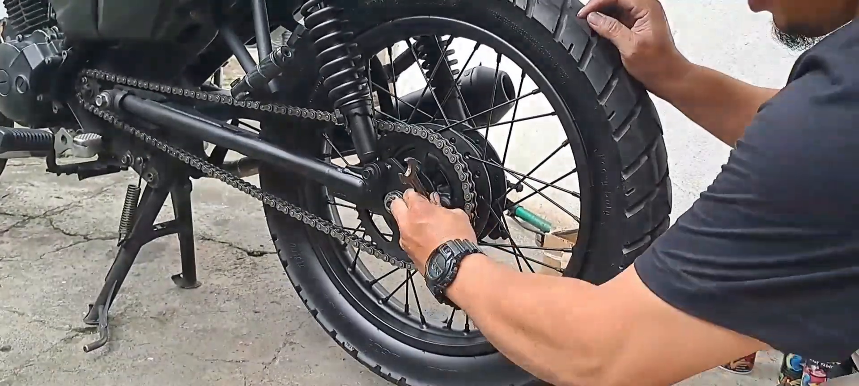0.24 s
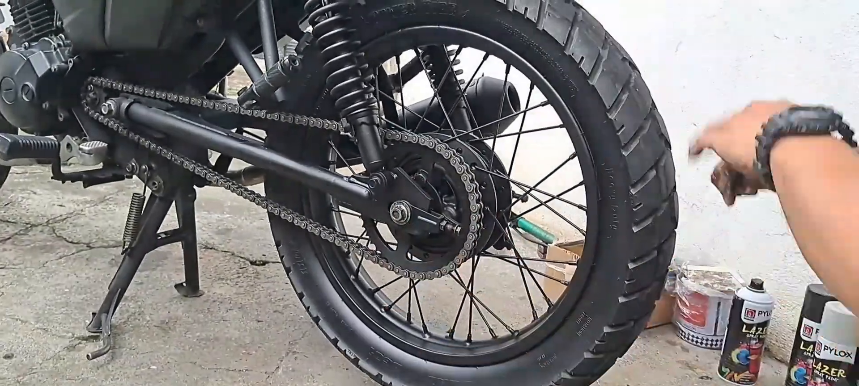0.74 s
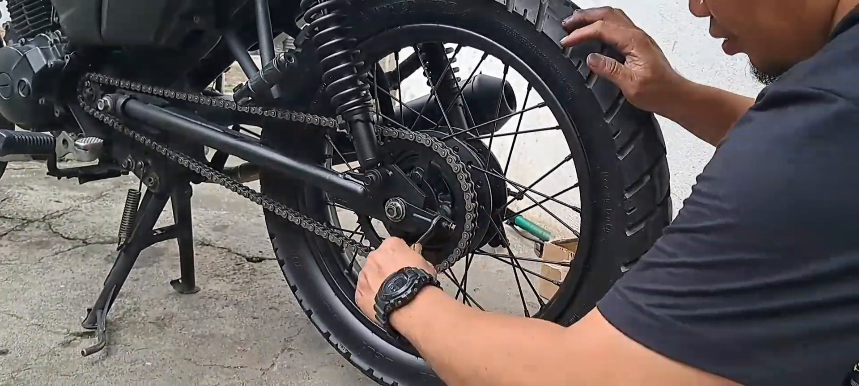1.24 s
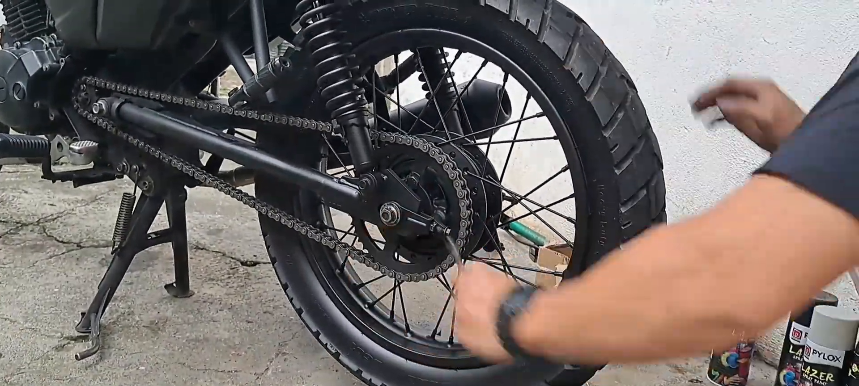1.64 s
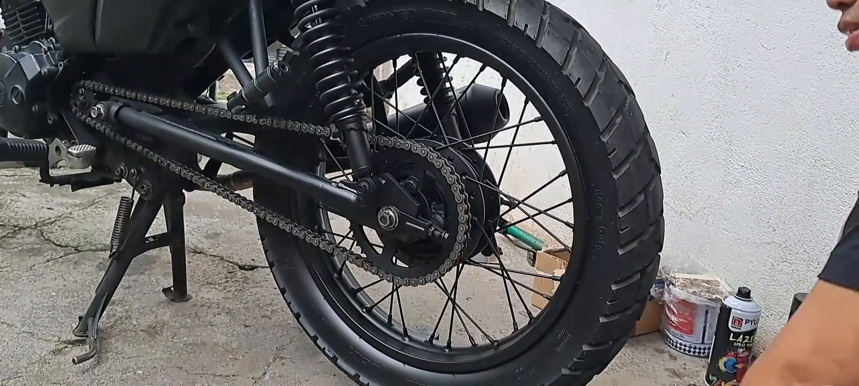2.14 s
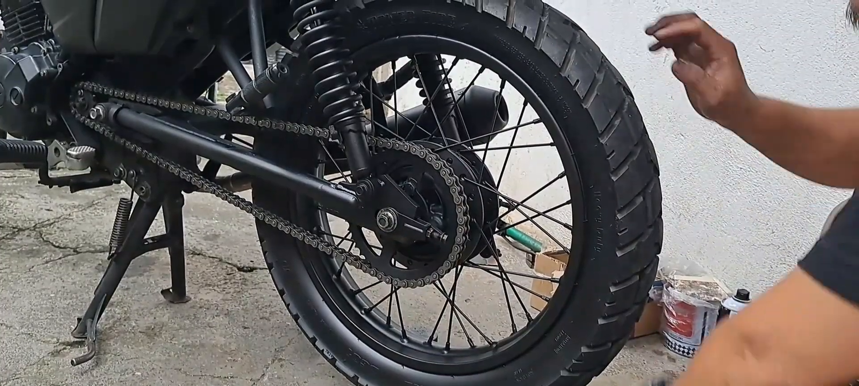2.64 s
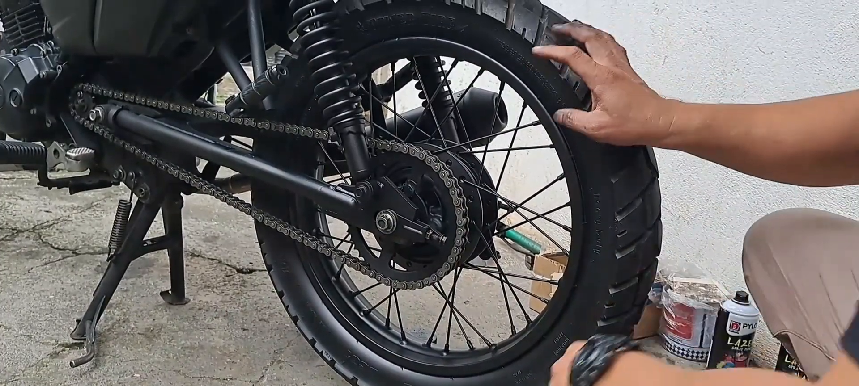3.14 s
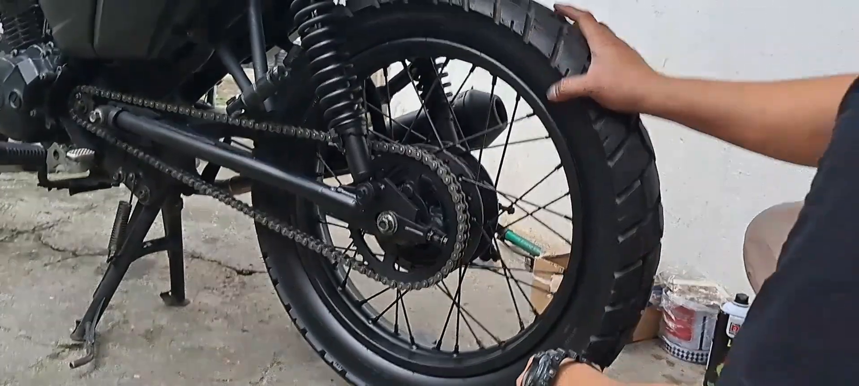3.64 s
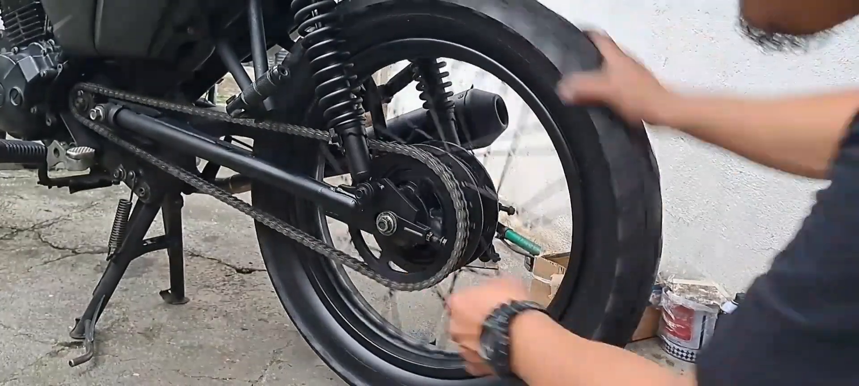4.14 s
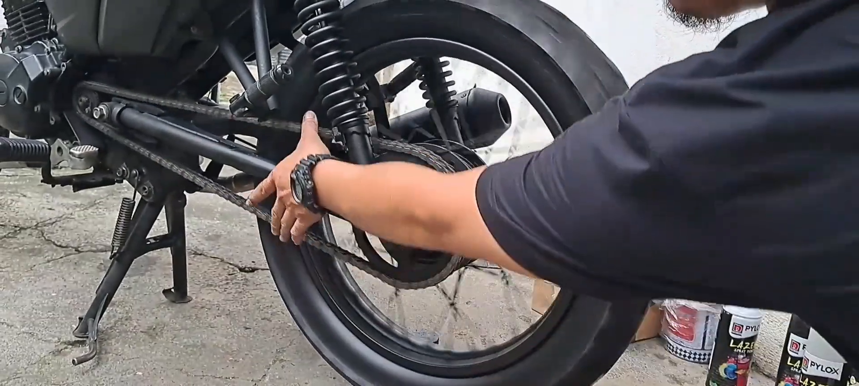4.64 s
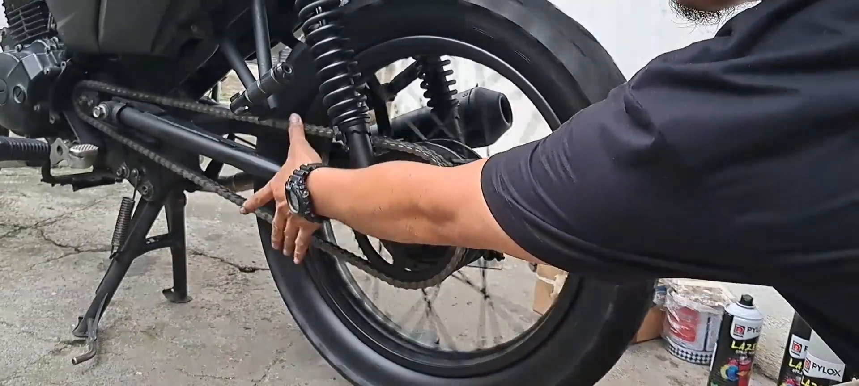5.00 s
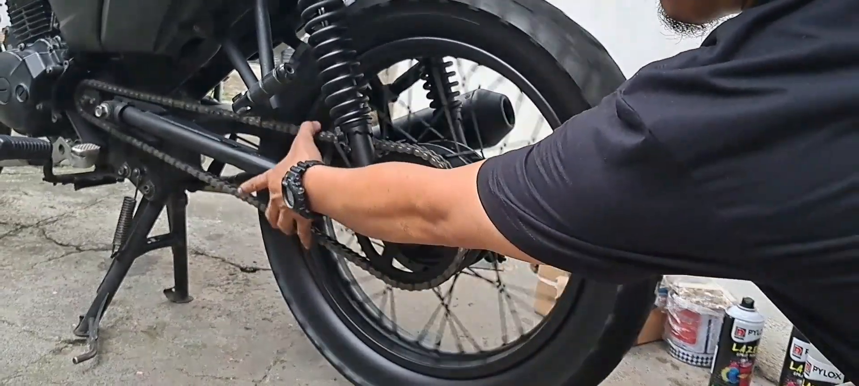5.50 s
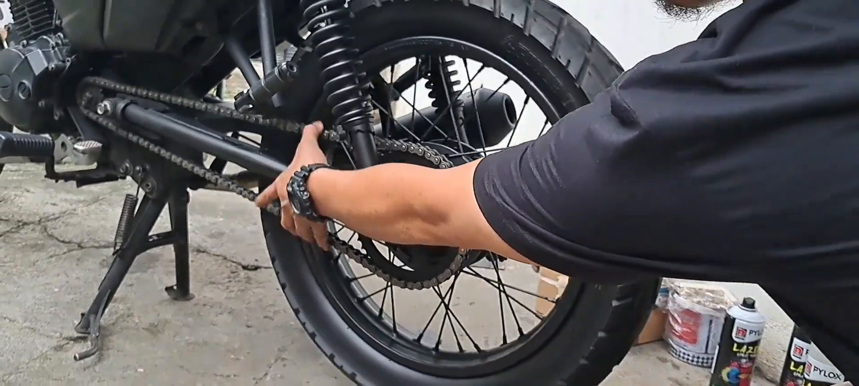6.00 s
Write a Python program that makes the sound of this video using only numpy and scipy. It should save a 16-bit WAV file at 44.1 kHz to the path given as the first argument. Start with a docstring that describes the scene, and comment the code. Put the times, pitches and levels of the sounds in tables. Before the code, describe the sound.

A few ratcheting scrapes, a bright clatter of tools on the ground, then a fast chain whirr of ticks and slaps that dies to quiet.

```python
"""Garage yard, a motorcycle on its stand: a spanner rasps on the chain adjuster in short strokes, then
steel tools slide, jangling, on the concrete. A hand spins the rear wheel: the chain ticks, rattles and
slaps as it slows to rest. Rasps and scuffs are coloured noise; tools are modes fed by friction.
Wheel speed sets the rate and level of the ticks and the level of rattle and rumble."""
import sys
import numpy as np
from scipy import signal
from scipy.fft import rfft, irfft, next_fast_len
from scipy.io import wavfile
from scipy.ndimage import uniform_filter1d, map_coordinates

SR = 44100
rng = np.random.default_rng(int(sys.argv[2]) if len(sys.argv) > 2 else 0)


def generate_wav(signal):
    """Clip the signal to [-1, 1] and save it as 16-bit WAV at the path in sys.argv[1]."""
    frames = np.transpose(np.atleast_2d(signal))
    scaled = np.clip(frames, -1, 1) * 32767
    pcm = np.round(scaled).astype(np.int16)
    wavfile.write(sys.argv[1], SR, pcm)


N = 276048

# All levels are relative: sources and mix scale them further.
# strokes on the adjuster nut: (peak time [s], level [dB], fade t60 [s], tilt [dB/octave], ring [Hz])
RASP_STROKES = [(0.466, -18.5, 0.064, 0, 1250), (0.887, -52.5, 0.099, -0.5, 1800),
                (1.051, -48, 0.3, -6.5, 1960), (1.177, -23, 0.096, 0, 2110), (1.211, -26, 0.034, 3, 2100),
                (1.298, -38, .05, 3.5, 6340), (1.347, -40, 0.061, -9.5, 2010),
                (1.561, -33.5, 0.055, -8.5, 1020), (1.659, -41, 0.071, -3, 1920),
                (1.724, -26, 0.057, 3, 1960), (1.735, -22, 0.042, 0, 1940)]
# dry snaps of tools and wheel: (time [s], level [dB], knock re snap [dB])
SNAP_EVENTS = [(0.07, -35, 4), (1.21, -10, -30), (1.3, -28.5, -11), (1.735, -11, -29), (2.1642, -15.5, -10),
               (2.18, -24, -9), (2.207, -21, 0), (2.2246, -21, 1), (2.966, -21, -16), (3.584, -37, -4.5),
               (3.7233, -17, -1), (4.133, -26, -23), (6.029, -34.5, -8)]
# soft bumps of hand and arm on the bike: (time [s], level [dB], pitch [Hz])
BUMP_EVENTS = [(.016, -31, 147.4), (.058, -29.5, 109), (.122, -27.5, 116), (.152, -34.5, 134),
               (.497, -36, 126), (.529, -38, 126), (0.806, -38.5, 102), (0.878, -44, 184), (.973, -39, 113),
               (1.984, -39, 128), (2.025, -34, 105)]
# modes of three steel tools: (frequency [Hz], level [dB], t60 [s])
SPANNER_MODES = [(1358, -25, .3), (2030, -32, .2), (2805, -14, .27), (4040, -19, .45), (4717, -2, .18),
                 (5385, -15, .3), (5922, -10, .3), (6290, -9, .25), (7100, 0, .3), (7135, -10, .2),
                 (7285, -8, .25), (8575, -20, .35), (9780, -5, .3), (10195, -7, .3), (10830, -13, .3),
                 (11350, -8, .28), (12280, -13, .12), (12460, -2, .12), (12840, -3, .22), (13180, -10, .2),
                 (13385, -13, .15), (14150, -10, .22), (15160, -8, .35)]
WRENCH_MODES = [(3011, -16, .08), (5555, -12, .1), (6298, -19, .1), (6683, -11, .14), (9081, -21, .1),
                (9447, -16, .1), (10825, 0, .07), (11226, -6, .08), (11800, -16, .06), (12236, -14, .08),
                (14413, -8, .09), (14890, -14, .07), (15148, -14, .08)]
PIN_MODES = [(5050, -9.5, 0.24), (9540, 4, 0.24), (14860, -0.5, 0.21), (15300, 1, 0.21)]
# tool contacts with the floor:
# (time [s], level [dB], swell [s], fade t60 [s], tilt [dB/octave], singing frequency [Hz])
SPANNER_CONTACTS = [(1.975, -48.5, 0.0012, 0.027, 3, 10830), (2.046, -32, 0.00054, 0.004, -13, 4690),
                    (2.219, -20, 0.0033, 0.041, 6, 7200), (2.236, -18, .025, .094, -1, 4600),
                    (2.265, -19.5, 0.027, 0.076, 3.5, 4900), (2.31, -21.5, .018, 0.3, 3.5, 12560),
                    (2.412, -30, 0.0086, .052, -1.5, 7300), (2.513, -20, 0.006, 0.26, 8.5, 12700),
                    (2.531, -21.5, 0.0078, 0.21, 6, 12500), (2.644, -33.5, 0.0021, 0.15, .5, 5470),
                    (2.833, -49.5, .0046, .017, 3.5, 10195), (2.915, -55.5, 0.0043, 0.021, 5, 5385)]
WRENCH_CONTACTS = [(2.162, -20, 0.0019, 0.24, -0.29, 14413), (2.174, -15, 0.0067, 0.045, -2, 11450),
                   (2.187, -15, .008, 0.15, 1, 10600), (2.532, -27.5, 0.0014, 0.037, -2, 6700)]
PIN_CONTACTS = [(2.965, -39.5, 0.0025, 0.066, -2, 15300), (2.975, -33, 0.059, 0.1, -2, 9496),
                (3.035, -31.5, 0.028, 0.073, 7.5, 9550), (3.108, -54, 0.0027, .03, -14.5, 4980)]
# slaps of the slack chain: (time [s], level [dB])
SLAP_EVENTS = [(4.184, -32), (4.295, -22.5), (4.41, -38), (4.436, -40), (4.588, -34), (4.652, -20.5),
               (4.717, -30.5), (4.787, -35), (4.999, -25.5), (5.075, -24), (5.155, -27.5), (5.24, -40),
               (5.497, -47), (5.605, -36.5), (5.823, -29), (6.029, -45)]
# resonances of adjuster and swingarm: (frequency [Hz], width [Hz], level [dB])
ADJUSTER_RESONANCES = [(875, 420, 1.5), (1180, 71, 7.5), (1420, 143, 9), (1960, 160, -3), (2120, 140, -4.5),
                       (6600, 990, -11), (7350, 680, 1)]
SWINGARM_RESONANCES = [(840, 34, -5.5), (1310, 230, 3.5), (1517, 58, -5), (2060, 14, 8.5)]
# note lingering after a stroke: (frequency [Hz], width [Hz], t60 [s])
ADJUSTER_NOTE = (1945, 120, 0.42)
# faint tinks of the settling links: (time [s], level [dB])
TINK_EVENTS = [(6.046, -62.5), (6.107, -61.5)]
# modes of a link: (frequency [Hz], level [dB], t60 [s])
LINK_MODES = [(3830, -5.5, 0.091), (4640, 2, 0.067)]
# shuffles of sleeves and shoes: (peak time [s], level [dB], fade t60 [s])
SHUFFLE_EVENTS = [(1.999, -51, 0.11), (2.061, -42, 0.26), (3.002, -52.5, .5), (3.28, -63, 0.21),
                  (3.73, -61.5, 0.48), (3.86, -64.5, 0.53), (3.995, -56.5, 0.31)]
# noise spectra: (frequency [Hz], level [dB])
RASP_SPECTRUM = [(59, -51), (100, -11), (634, -16.5), (1390, -11.5), (1680, -15), (1910, -4), (3540, -15.5),
                 (6560, -11.5), (9020, -30), (10500, -17), (12700, -18), (14700, -30), (16000, -46)]
TICK_SPECTRUM = [(1500, -53), (3000, -2), (5000, -7), (7700, 0.5), (9000, -4.5), (13000, -1.5), (15000, -4),
                 (16500, -25)]
RATTLE_SPECTRUM = [(180, -58), (300, -2.5), (689, -9.5), (828, 5.5), (961, -2.5), (1460, 1.5),
                   (2320, -12.5), (7820, -17.5), (8940, -25), (12700, -15), (14700, -27), (16000, -33)]
GRIT_SPECTRUM = [(150, -12), (400, -19), (1500, 10), (4000, -6), (7000, 9), (8500, -10.5), (10500, -3.5),
                 (12500, -3), (15000, -4.5), (16000, -28)]
PALM_SPECTRUM = [(120, -37), (200, -12.5), (322, -3.5), (558, -19.5), (1270, -13), (1560, -11.5),
                 (13100, -23.5), (15100, -33), (16000, -46)]
RUMBLE_SPECTRUM = [(60, -17.5), (110, -0.5), (150, 3), (220, -2.5), (320, -10.5), (450, -15.5), (900, -46)]
AIR_SPECTRUM = [(200, -18), (450, 7), (800, 1), (1300, -5), (2000, -3.5), (3000, -18), (6000, -30.5),
                (15000, -40)]
RUSTLE_SPECTRUM = [(1500, -7), (3000, -3), (7000, -5.5), (9000, -14), (14000, -5.5), (16000, -26)]
DEEP_SPECTRUM = [(20, -29.5), (45, -7), (64, 1), (85, -9.5), (130, -22.5), (300, -61.5)]
SNAP_SPECTRUM = [(150, -10.5), (500, 0), (1500, 7), (4000, -6.5), (7000, -1), (12500, -11), (15000, -14),
                 (16000, -29)]
SCRAPE_SPECTRUM = [(150, -11.5), (350, 4.5), (600, 3), (900, -2), (1400, -0.5), (2400, 2), (3500, -13.5),
                   (8000, -28)]
# decay of the wall and floor reflections: (frequency [Hz], t60 [s])
WALL_DECAY = [(150, .25), (2000, 0.12), (12000, .13)]
# range of the minor tool partials: (lowest [Hz], highest [Hz])
MINOR_RANGE_HZ = (2400, 15600)

TOP_HZ = 16100  # upper band limit
RASP_RISE_SHARE = 0.27  # a stroke's last 30 dB of rise, as a share of its fade t60
BUMP_T60_S, SWAY_T60_S = 0.11, 0.26  # SWAY applies to the bike's deep sway on its stand
# throw by hand, coasting, then braking by the hand at the chain
THROW_S, THROW_LINKS_PER_S, COAST_TIME_CONSTANT_S = 4.1755, 44.65, 2.266
BRAKE_S, BRAKE_TIME_CONSTANT_S = 5.52, .2835  # braking adds to coasting
# level at full speed and exponent of speed
TICK_DB, TICK_POWER = -34, 1.9
RATTLE_DB, RATTLE_POWER = -49.5, 1.16
WHEEL_DB, WHEEL_POWER = -48.5, 0.18
# hand on the tread: full from SWEEP_S for SWEEP_HOLD_S
SWEEP_S, SWEEP_DB, SWEEP_HOLD_S = 4.202, -35, 0.037
SWEEP_RISE_T60_S, SWEEP_FADE_T60_S = .15, 0.32
AIR_DB, DEEP_DB, RUMBLE_DB = -61.5, -53, -53
RUMBLE_FROM_S, LULL_DB = 1.96, -12  # the deep rumble is weaker before this time


def amp(db):
    """Decibels to gain."""
    return 10 ** (np.asarray(db) / 20)


def unit(x):
    """Scaled to rms 1."""
    return x / np.sqrt(np.mean(x ** 2) + 1e-20)


def fade(t_s, t60_s):
    """Falls 60 dB in t60_s."""
    return np.exp(-np.log(1000) * t_s / np.maximum(t60_s, 1e-4))


def swell(t_s, peak_s, rise_s, fall_t60_s):
    """Rises exponentially, 30 dB in rise_s, to a peak; then falls 60 dB in fall_t60_s."""
    rise = fade(np.maximum(peak_s - t_s, 0), rise_s * 2)
    return rise * fade(np.maximum(t_s - peak_s, 0), fall_t60_s)


def clock(seconds):
    """Sample times from zero."""
    return np.arange(int(seconds * SR)) / SR


def along(points, hz):
    """Interpolates (frequency [Hz], value) points on a log axis."""
    f, v = np.transpose(points)
    return np.interp(np.log(hz + 1), np.log(f + 1), v)


def wobble(rate_hz, size):
    """Smooth random curve, rate_hz knots a second."""
    knots = rng.standard_normal(int(size * rate_hz / SR) + 4)
    return map_coordinates(knots, [np.arange(size) * rate_hz / SR])


def add(track, s, sound):
    """Mixes a sound in at time s."""
    start = max(round(s * SR), 0)
    track[..., start:start + sound.shape[-1]] += sound[..., :N - start]


def filtered(x, response):
    """Multiplies the spectrum of x by a response of frequency."""
    size = x.shape[-1]
    m = next_fast_len(size + 8192)
    return irfft(rfft(x, m) * response(np.fft.rfftfreq(m, 1 / SR)), m)[..., :size]


def body(modes, f):
    """Sum of (frequency [Hz], width [Hz], level [dB]) resonances of alternating sign."""
    total = 0
    for k, (centre, width, db) in enumerate(modes):
        damping = 1j * f * width
        total = total + (-1) ** k * amp(db) * damping / (centre * centre - f * f + damping)
    return total


def colour(points):
    """Response through (frequency [Hz], level [dB]) points."""
    return lambda f: amp(along(points, f))


def noise(response, size, side_db, left_db):
    """Coloured stereo noise of rms 1."""
    mid, side = filtered(rng.standard_normal((2, size)), response)
    side = side * amp(side_db)
    return unit(np.array([(mid + side) * amp(left_db), mid - side]))


def grains(size, rate_hz, spread_db):
    """Envelope of rms 1: tiny slips of uneven strength."""
    slips = (rng.random(size) < rate_hz / SR) * amp(spread_db * rng.standard_normal(size).clip(-2, 2))
    return unit(signal.fftconvolve(slips, fade(clock(.02), 0.005))[:size])


def yard(hiss_db=-85):
    """Low outdoor rumble, steady open air and a faint hiss, as coloured noise."""
    lull_db = LULL_DB * np.clip((RUMBLE_FROM_S - np.arange(N) / SR) * 20, 0, 1)
    deep_gain = amp(DEEP_DB + lull_db + 2 * wobble(13, N))
    low = deep_gain * noise(colour(DEEP_SPECTRUM), N, side_db=-5.5, left_db=-1.5)
    rumble_gain = amp(RUMBLE_DB + 1.1 * wobble(14, N))
    low += rumble_gain * noise(colour(RUMBLE_SPECTRUM), N, side_db=-7.5, left_db=0.0)
    air = amp(AIR_DB + wobble(11, N)) * noise(colour(AIR_SPECTRUM), N, side_db=0.0, left_db=-3.5)
    hiss = amp(hiss_db) * noise(colour(RUSTLE_SPECTRUM), N, side_db=6.0, left_db=0.0)
    return low + air + hiss


def bumps(left_db=-6, sway_db=-13):
    """Flesh on tyre and frame: low, heavily damped throbs over a deep sway."""
    out, t = np.zeros((2, N)), clock(0.3)
    scuff_spectrum = [(40, -7.5), (150, 5), (300, -10.5), (700, -27.5), (3000, -55.0)]
    for s, db, hz in BUMP_EVENTS:
        throb = -np.sin(2 * np.pi * hz * t) * amp([[left_db], [0]])
        scuff = noise(colour(scuff_spectrum), len(t), side_db=-2.0, left_db=-3.5)
        sway = noise(colour(DEEP_SPECTRUM), len(t), side_db=4.5, left_db=-4) * fade(t, SWAY_T60_S)
        bump = (throb + 0.71 * scuff) * fade(t, BUMP_T60_S) + amp(sway_db) * sway
        soft_onset = 1 - fade(t, 0.018)
        add(out, s, amp(db + 5.0) * bump * soft_onset)
    return out


def snaps(knock_hz=450):
    """Very short noise crack over one dead sine knock."""
    out, t = np.zeros((2, N)), clock(0.096)
    for s, db, knock_db in SNAP_EVENTS:
        crack = noise(colour(SNAP_SPECTRUM), len(t), side_db=-1, left_db=-10.5) * fade(t, 0.0018)
        knock = np.sin(2 * np.pi * knock_hz * t) * fade(t, 0.0062)
        add(out, s, amp(db) * (0.66 * crack + amp(knock_db) * knock))
    return out


def rasps(steel_db=9, slip_share=0.29, ring_db=4, grip_db=-2.0, linger_db=-29):
    """Spanner jaws stick and slip on the nut; each grip rings the adjuster a little differently."""
    out, t, lead_s = np.zeros((2, N)), clock(.45), .1
    note_hz, note_width_hz, note_t60_s = ADJUSTER_NOTE
    for s, db, fall_s, tilt, ring_hz in RASP_STROKES:
        resonances = ADJUSTER_RESONANCES + [(ring_hz, 120, ring_db)]

        def response(f):
            steel = 1 + amp(steel_db) * abs(body(resonances, f))
            return colour(RASP_SPECTRUM)(f) * steel * amp(tilt * np.log2((f + 200) / 2000))

        grind = noise(response, len(t), side_db=-3, left_db=-1.5)
        grind = grind * (1 - slip_share + slip_share * grains(len(t), rate_hz=910, spread_db=-3))
        # levels off while the jaws slip
        effort = np.minimum(swell(t, lead_s, RASP_RISE_SHARE * fall_s, fall_s), amp(grip_db))
        note = noise(lambda f: body([(note_hz, note_width_hz, 0)], f) ** 2, len(t), side_db=0, left_db=-2.5)
        lingering = amp(linger_db) * note * swell(t, lead_s, fall_s, note_t60_s)
        add(out, s - lead_s, amp(db) * (grind * effort + lingering))
    return out


def shuffles(dull_db=-1, rise_share=0.36):
    """Sleeves and shoes as the mechanic shifts: bright rustle and duller scuff swell and fade."""
    t = np.arange(N) / SR
    motion = sum(amp(db) * swell(t, s, rise_share * fall_s, fall_s) for s, db, fall_s in SHUFFLE_EVENTS)
    rustle = amp(wobble(7, N)) * noise(colour(RUSTLE_SPECTRUM), N, side_db=-1.0, left_db=-4.0)
    scuff = amp(dull_db) * noise(colour(AIR_SPECTRUM), N, side_db=-3.5, left_db=-2.5)
    return motion * (rustle + scuff)


def scrape(scrape_db=-31, rise_s=.012, fade_t60_s=0.98):
    """Dull concrete scrape under the sliding spanner and wrench; contact powers add."""
    t = np.arange(N) / SR
    contacts = SPANNER_CONTACTS + WRENCH_CONTACTS
    power = sum((amp(db) * swell(t, s, rise_s, fade_t60_s)) ** 2 for s, db, *_ in contacts)
    return amp(scrape_db) * np.sqrt(power) * noise(colour(SCRAPE_SPECTRUM), N, side_db=-4.5, left_db=-1.5)


def minor_modes(count, db, max_t60_s):
    """Weak partials that change with the contact point: (frequency [Hz], level [dB], t60 [s])."""
    hz = rng.uniform(*MINOR_RANGE_HZ, count)
    level_db = db + along(GRIT_SPECTRUM, hz) + 4 * rng.standard_normal(count)
    return np.transpose([hz, level_db, max_t60_s * rng.uniform(0.64, 1.0, count)])


def tool(modes, contacts, count, minor_db, minor_t60_s, grit_db, blur_hz, flutter_db, sing_db, left_db):
    """Sliding on concrete feeds each mode with energy, which it stores and loses at its own speed."""
    out, t = np.zeros((2, N)), clock(.36)
    slow = t[::32]  # control-rate times

    def spread(rows):
        return np.array([np.interp(t, slow, row) for row in rows], np.float32)

    for s, db, rise_s, fall_s, tilt, sing_hz in contacts:
        all_modes = np.vstack([modes, minor_modes(count, minor_db, minor_t60_s)])
        hz, level_db, t60_s = all_modes.T[..., None]
        rub = np.minimum(slow / max(rise_s, 1e-4), 1) * fade(np.maximum(slow - rise_s, 0), fall_s)
        energy = signal.fftconvolve(rub[None] ** 2, fade(slow, t60_s) ** 2, axes=1)[:, :len(slow)]
        stored = np.sqrt(abs(energy))
        # stick and slip favour modes near sing_hz
        boost_db = sing_db / (1 + ((hz - sing_hz) / 300) ** 2)
        gain = amp(level_db + boost_db + tilt * np.log2(hz / 8000) + rng.standard_normal(hz.shape))
        gain = gain / np.linalg.norm(gain) * stored / stored.max(axis=1, keepdims=True)
        # floor grains jolt phase and strength, phase mostly during contact
        jolt_size = np.sqrt(2 * np.pi * abs(blur_hz) * (rub + 0.033) * slow[1])
        jolts = np.cumsum(rng.standard_normal(stored.shape) * jolt_size, axis=1)
        smooth = uniform_filter1d(rng.standard_normal(stored.shape), size=14, axis=1)
        flutter = amp(flutter_db * unit(smooth))
        phase = (2 * np.pi * (hz * t + rng.random(hz.shape))).astype(np.float32) + spread(jolts)
        # each partial has its own phase offset between left and right
        offset = rng.uniform(-1.25, 1.25, hz.shape).astype(np.float32)
        strength = spread(gain * flutter)
        left, right = [(strength * np.sin(phase + side * offset)).sum(axis=0) for side in (1, -1)]
        ring = np.sqrt(2) * np.array([left, right])
        grit = noise(colour(GRIT_SPECTRUM), len(t), side_db=-1, left_db=-1.5) * spread([rub])
        grit = grit * grains(len(t), rate_hz=1400, spread_db=2.5)
        add(out, s, amp(db) * (ring + amp(grit_db) * grit))
    return out * amp([[left_db / 2], [-left_db / 2]])


def palm():
    """The hand sweeps over the tread as it throws the wheel round: noise with rise, hold, fade."""
    t = np.arange(N) / SR - SWEEP_S
    rise = fade(np.maximum(-t, 0), SWEEP_RISE_T60_S)
    pressure = rise * fade(np.maximum(t - SWEEP_HOLD_S, 0), SWEEP_FADE_T60_S)
    return amp(SWEEP_DB) * pressure * noise(colour(PALM_SPECTRUM), N, side_db=-1.5, left_db=-2.0)


def wheel_speed():
    """Chain speed as a share of the throw: dies away slowly, then fast under the hand."""
    t = np.arange(N) / SR
    coasting = np.maximum(t - THROW_S, 0) / COAST_TIME_CONSTANT_S
    braking = np.maximum(t - BRAKE_S, 0) / BRAKE_TIME_CONSTANT_S
    return (t >= THROW_S) * np.exp(-coasting - braking)


def wheel(deep_db=-3, whirr_db=-12, hum_db=-6):
    """The wheel rumbles through the frame and whirrs faintly; frame hum grows as speed squared."""
    speed = wheel_speed()
    rumble = amp(1.95 * wobble(14, N)) * noise(colour(RUMBLE_SPECTRUM), N, side_db=-13.5, left_db=-1.5)
    deep = amp(deep_db) * noise(colour(DEEP_SPECTRUM), N, side_db=-14.5, left_db=-3.0)
    whirr = amp(whirr_db) * noise(colour(AIR_SPECTRUM), N, side_db=-10.0, left_db=2)
    frame = noise(lambda f: body([(218, 110, 0)], f) ** 2, N, side_db=-17, left_db=0)
    hum = amp(hum_db) * speed ** 2 * frame
    return amp(WHEEL_DB) * (speed ** WHEEL_POWER * (rumble + deep + whirr) + hum)


def chain(slap_db=-8.0, tick_t60_s=0.022, loose_db=-20, clack=1.64, link_db=8):
    """Each roller ticks as it seats on a tooth; links rattle and the slack run slaps the swingarm."""
    speed = wheel_speed()
    links = np.ceil(np.cumsum(THROW_LINKS_PER_S * speed) / SR)
    ticks, clacks, slaps, t = np.zeros((2, N)), np.zeros(N), np.zeros(N), clock(0.11)
    tick_fade = fade(t, tick_t60_s) + amp(loose_db) * fade(t, .16)
    for s in np.flatnonzero(np.diff(links)) / SR:
        plates = [(hz, 500, link_db) for hz in rng.uniform(3540, 14640, size=3)]
        response = lambda f: colour(TICK_SPECTRUM)(f) * (1 + abs(body(plates, f)))
        tick = noise(response, len(t), side_db=3, left_db=1)
        add(ticks, s - .001, amp(3.1 * rng.standard_normal()) * tick * tick_fade)
        add(clacks, s - .001, amp(0.31 * rng.standard_normal()) * fade(t, 0.023))
    for s, db in SLAP_EVENTS:
        add(slaps, s - .002, amp(db + slap_db) * fade(t, 0.081))
    rattle = 1.62 * grains(N, rate_hz=680, spread_db=0.5) + clack * clacks
    rolling = amp(RATTLE_DB) * speed ** RATTLE_POWER * rattle
    blows = (rolling + slaps) * noise(colour(RATTLE_SPECTRUM), N, side_db=-2.5, left_db=-2.5)
    swingarm = filtered(blows, lambda f: body(SWINGARM_RESONANCES, f))
    return amp(TICK_DB) * speed ** TICK_POWER * ticks + 0.73 * blows + 1.16 * swingarm


def tinks():
    """A link rings faintly, as decaying sines, while the chain comes to rest."""
    out, t = np.zeros((2, N)), clock(.15)
    ring = sum(amp(db) * np.sin(2 * np.pi * hz * t) * fade(t, t60_s) for hz, db, t60_s in LINK_MODES)
    for s, db in TINK_EVENTS:
        add(out, s, amp(db) * ring)
    return out


def walls(x):
    """Short answer of wall and floor: convolution with decaying noise, the lows lasting longest."""
    hz, t, z = signal.stft(rng.standard_normal((2, SR // 3)), SR, nperseg=256)
    tail = signal.istft(z * fade(t, along(WALL_DECAY, hz)[:, None]), SR, nperseg=256)[1]
    tail = np.pad(tail, ((0, 0), (SR // 200, 0)))  # 5 ms pre-delay
    return signal.fftconvolve(x, tail / np.linalg.norm(tail[0]), axes=1)[:, :N]


def scene():
    """Mixes all sources; floor tools and bike parts also feed the walls."""
    spanner = tool(SPANNER_MODES, SPANNER_CONTACTS, count=16, minor_db=-12.5, minor_t60_s=.25,
                   grit_db=-16.5, blur_hz=10, flutter_db=4.5, sing_db=6.5, left_db=-2.0)
    wrench = tool(WRENCH_MODES, WRENCH_CONTACTS, count=14, minor_db=-24, minor_t60_s=0.09,
                  grit_db=-15, blur_hz=16, flutter_db=2.5, sing_db=8.0, left_db=-1.5)
    pin = tool(PIN_MODES, PIN_CONTACTS, count=6, minor_db=-39, minor_t60_s=0.11,
               grit_db=-20.5, blur_hz=10.3, flutter_db=2.0, sing_db=3.0, left_db=-1.5)
    floor_tools = spanner + wrench + pin
    bike = rasps() + palm() + chain() + tinks()
    reflections = walls(amp(-19) * floor_tools + amp(-15.5) * bike)
    unreflected = yard() + bumps() + snaps() + shuffles() + scrape() + wheel()
    return floor_tools + bike + reflections + unreflected


def record(dry):
    """Steep low-pass at the band limit."""
    return filtered(dry, lambda hz: 1 / np.sqrt(1 + (hz / TOP_HZ) ** 120))


dry = scene()
out = record(dry)
generate_wav(out)
```